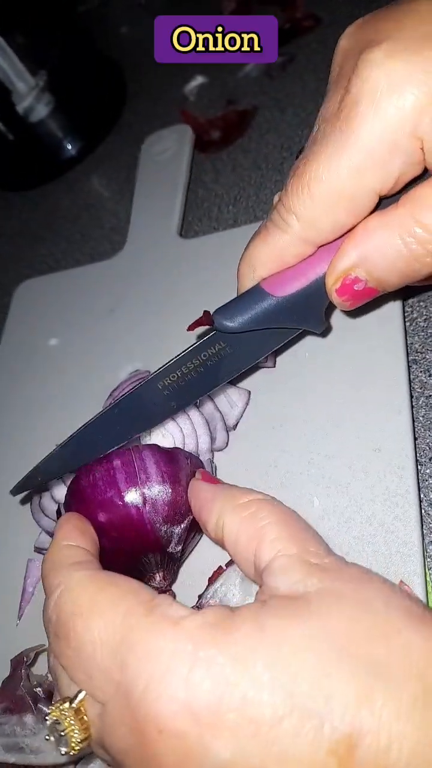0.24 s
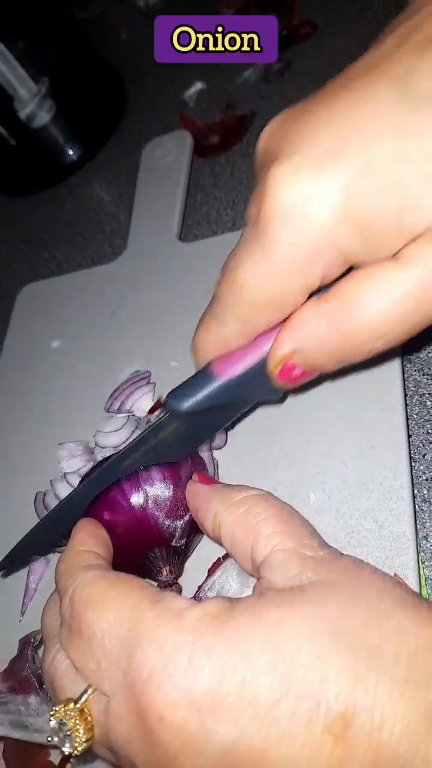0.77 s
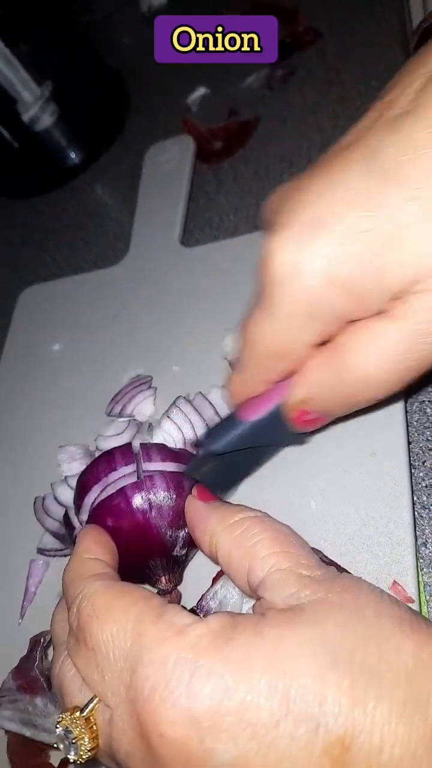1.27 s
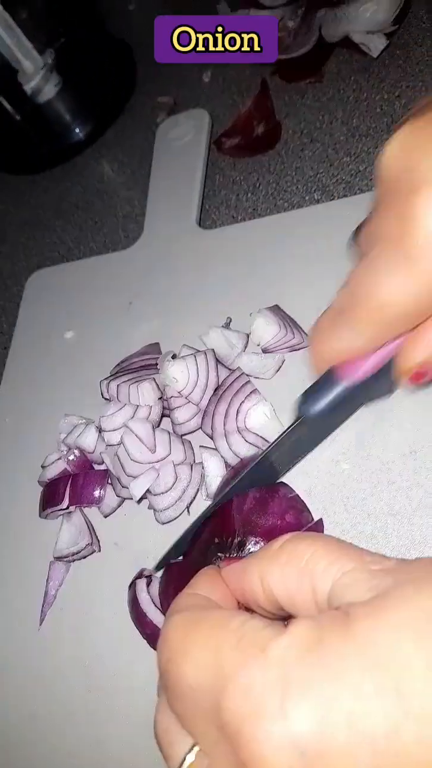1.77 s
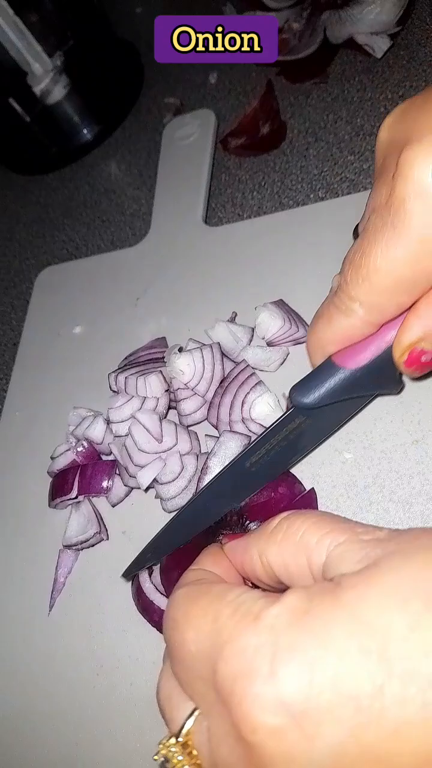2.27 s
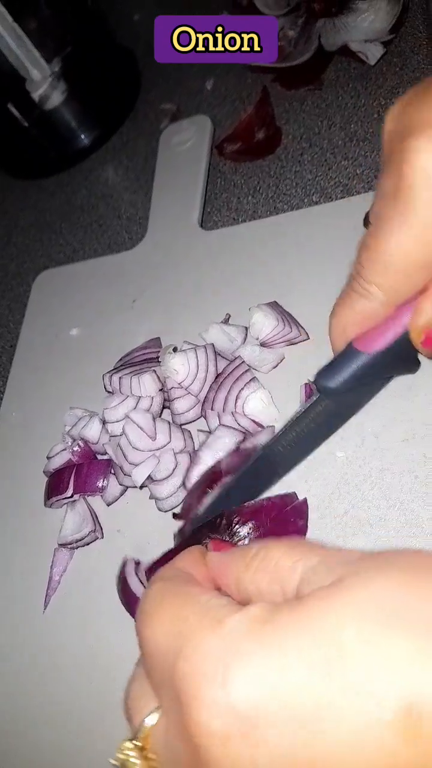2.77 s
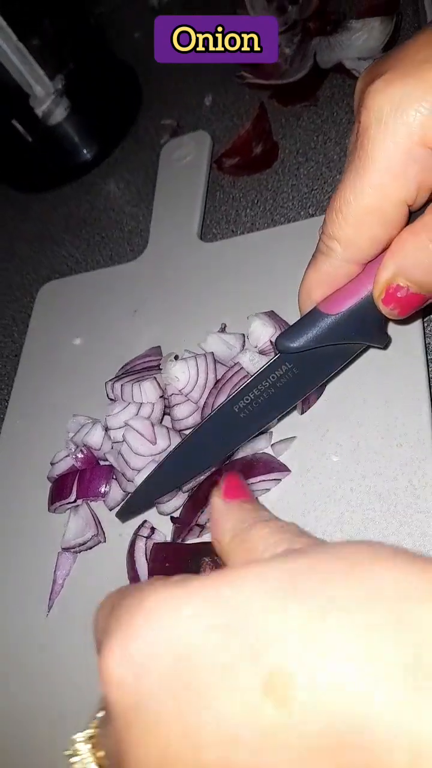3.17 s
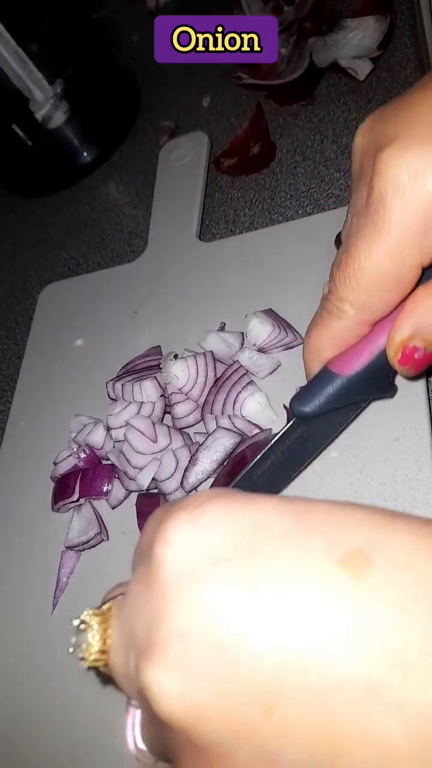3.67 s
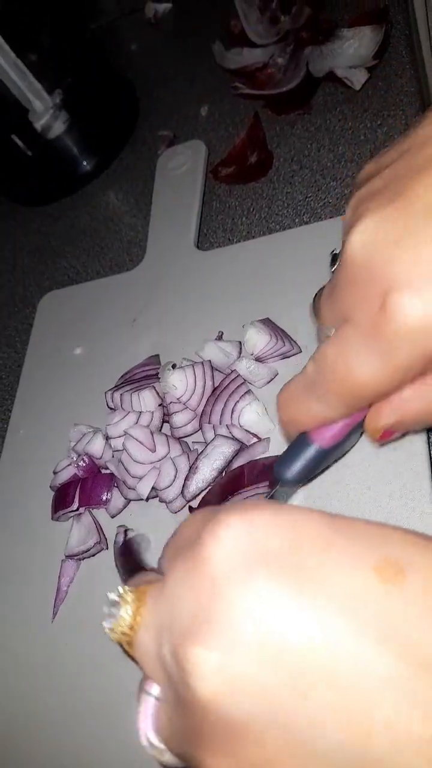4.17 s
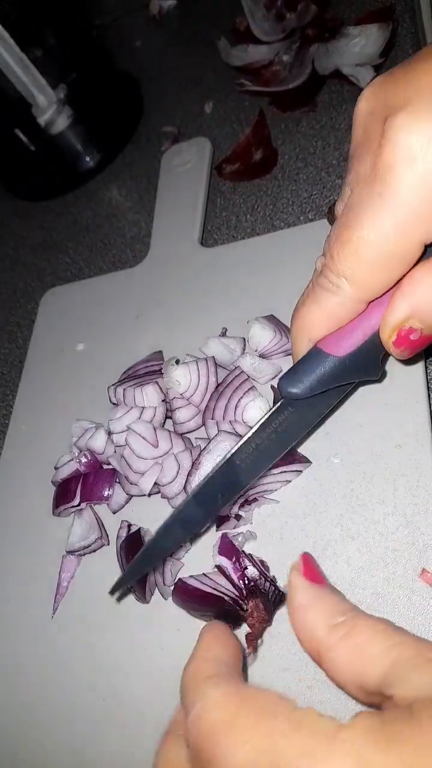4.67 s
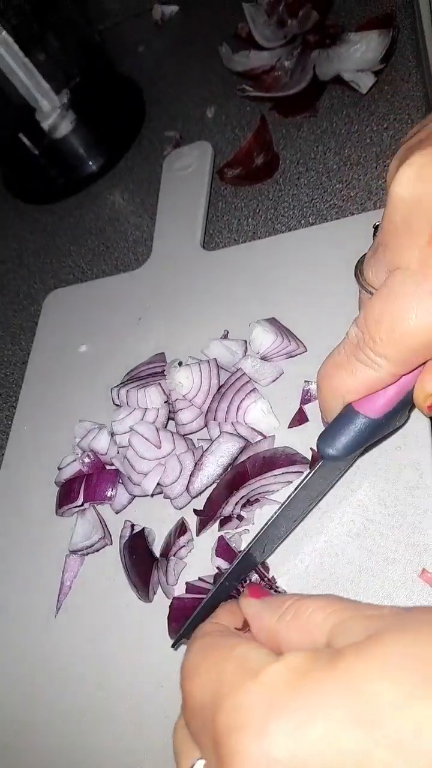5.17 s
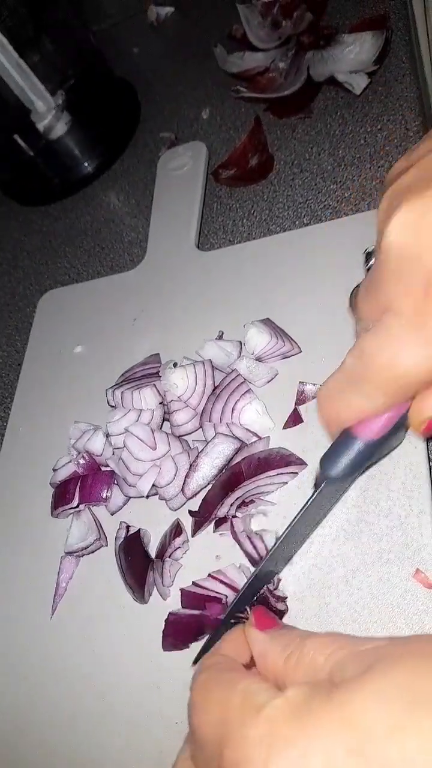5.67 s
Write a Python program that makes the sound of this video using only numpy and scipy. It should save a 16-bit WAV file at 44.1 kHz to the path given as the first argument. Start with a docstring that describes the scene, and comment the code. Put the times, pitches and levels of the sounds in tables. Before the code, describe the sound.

Very close onion cutting on a plastic board, in a small kitchen with a short room response. From 0 to 0.6 s it is nearly quiet, with a few dry papery ticks, the clearest at about 0.55. From 0.67 the blade bites: rasp and wet crunch build with sharp snaps, strongest around 1.38-1.45, then snaps and edge skids thin out until about 1.97. After a pause, two firm crunches come at 2.3-2.55 and 2.65. Then there are only faint ticks, taps and light rustling until 3.8. A gritty stroke with skids follows at 3.9-4.2, ending in a loud snap and deep soft thud near 4.15; a small scrape comes at 4.4. Quiet skin ticks lead to a final cluster of snaps at 5.4-5.72, loudest near 5.6, and a short skid at 5.85. A faint low motor hum and unsteady rumble stay underneath. Phone stereo, snaps brighter on the right.

```python
"""On a kitchen counter, a knife slices onion on a plastic board, close to a phone with two unlike microphones.
The blade crunches through the layers: grainy noise, coloured for skin and flesh, follows each stroke.
Filtered clicks and noise bursts make snaps, skids and dry ticks; board resonances make knocks and taps.
A household motor hums faintly behind as a few unsteady sine waves, with low rumble and room noise."""
import sys
import numpy as np
from scipy import signal
from scipy.fft import rfft, irfft, next_fast_len
from scipy.io import wavfile
from scipy.ndimage import uniform_filter1d, map_coordinates

SR = 44100
rng = np.random.default_rng(int(sys.argv[2]) if len(sys.argv) > 2 else 0)


def convert_level_to_amplitude(level_db):
    """Map a level in decibels to its linear amplitude factor."""
    exponent = np.asarray(level_db, float) / 20
    return 10 ** exponent


def to_wav(sig):
    """Store sig (one row per channel, or 1-D mono) as 16-bit WAV at the path in sys.argv[1].

    Samples outside -1..1 are clipped; the rate is SR.
    """
    pcm = np.clip(np.atleast_2d(sig), -1, 1) * 32767
    pcm = np.round(pcm).astype(np.int16)
    wavfile.write(sys.argv[1], SR, pcm.T)  # frames by channels


N = 261513  # length in samples


def unit(x):
    """Scales a sound to rms 1."""
    return x / np.sqrt(np.mean(x ** 2) + 1e-20)


def peak(x):
    """Scales each row to peak 1."""
    return x / abs(x).max(-1, keepdims=True)


def along(points, hz):
    """Reads a curve of (Hz, value) points on a log frequency axis."""
    f, v = np.transpose(points)
    return np.interp(np.log(hz + 1), np.log(f + 1), v)


def curves(rows, t):
    """Reads each column after the time column at the times t."""
    s, *cols = np.transpose(rows)
    return [np.interp(t, s, c) for c in cols]


def wobble(rate):
    """Draws a smooth random curve with rate knots a second."""
    knots = rng.standard_normal(int(N * rate / SR) + 4)
    return map_coordinates(knots, [np.arange(N) * rate / SR])


def filtered(x, response):
    """Multiplies the spectrum of x by a response given as a function of frequency."""
    m = 2 * next_fast_len(x.shape[-1] // 2 + SR // 8)  # padded so that ringing does not wrap round
    spectrum = rfft(x, m) * response(np.fft.rfftfreq(m, 1 / SR))
    return irfft(spectrum, m)[..., :x.shape[-1]]


def resonance(f, hz, width_hz):
    """One resonance that rings only after it is struck; a narrower width rings longer."""
    return 1j * f * width_hz / (hz * hz - f * f + 1j * f * width_hz)


def lay(rows, times):
    """Places short sounds in time on a stereo track."""
    out = np.zeros((2, N + SR))
    for row, s in zip(rows, times):
        out[:, round(s * SR):][:, :row.shape[-1]] += row
    return out[:, :N]


# How alike left and right are. Each row: frequency in Hz, likeness (0 unrelated, 1 identical).
LIKENESS = [(60, 1), (150, 0.72), (380, 1), (950, 0.16), (2380, 0.29), (5980, 0.34), (15000, 0.25)]


def paired(two):
    """Mixes two unrelated signals into a stereo pair with a set likeness at each frequency."""
    turn = lambda f: np.arccos(np.clip(along(LIKENESS, f), -1, 1)) / 2
    mid, side = filtered(two, lambda f: np.array([np.cos(turn(f)), np.sin(turn(f))]))
    return np.array([mid + side, mid - side])


# Ringing modes of the cutting board. Each row: frequency in Hz, width in Hz, relative level in dB.
BOARD_MODES = [(320, 82.3, 2.5), (339.3, 68, 4.5), (446, 66.7, -5), (572, 99, -16.5), (687.6, 46, -8.5),
               (818, 60, -12.5), (1007, 72, -13.5), (1400, 290, -13)]


def board(f):
    """The board rings in several modes at once, with alternating sign."""
    return sum((-1) ** k * convert_level_to_amplitude(db) * resonance(f, hz, w) for k, (hz, w, db) in enumerate(BOARD_MODES))


def crack(hz, noise):
    """One sharp click with a short spatter of noise, coloured around hz."""
    t = np.arange(noise.shape[-1]) / SR
    click = (t == 0) * 6 + convert_level_to_amplitude(-60 * t / .008) * noise
    return peak(filtered(click, lambda f: resonance(f, hz, .5 * hz) + 0.068 * resonance(f, 1600, 4000)))


def grainy(per_s, life_s, spread_db, bed):
    """Many small tears: a stereo pair of noises made of short bursts of uneven size on a smooth bed."""
    sizes = convert_level_to_amplitude(spread_db * np.clip(rng.exponential(size=N), 0, 3))
    kicks = (rng.random(N) < per_s / SR) * sizes
    bursts = signal.lfilter([1], [1, -np.exp(-1 / (life_s * SR))], kicks)
    return paired((unit(bursts) + bed) * rng.standard_normal((2, N)))


def patchy(pair, depth_db):
    """Each small tear has its own colour: random gain patches about 1 kHz wide and 17 ms long."""
    z = signal.stft(pair, nperseg=128)[2]
    field = rng.standard_normal(z.shape[1:])
    field = uniform_filter1d(uniform_filter1d(field, size=3, axis=0), size=12, axis=1)
    return signal.istft(z * convert_level_to_amplitude(depth_db * unit(field)), nperseg=128)[1][:, :N]


# Steady tones of the motor. Each row: frequency in Hz, relative level in dB.
MOTOR_LINES = [(55, -9.5), (110, -4), (165, -1), (220, -13.5), (275, -14.5), (330, -12.5)]
# Slow swelling of the background. Each row: time in seconds, hum setting in dB, rumble setting in dB.
SWELLING = [(0.0, -83, -93), (0.76, -66, -50.5), (0.89, -64.5, -48.5), (1.3, -69, -46.5),
            (1.75, -69.5, -54.5), (2.03, -60.5, -58), (2.26, -69, -54), (2.54, -58.5, -47.5),
            (2.86, -66, -64), (3.42, -68.5, -62.5), (4.11, -59.5, -60), (4.53, -70.5, -67.5),
            (4.84, -71.5, -64), (5.32, -68, -64), (5.61, -57.5, -50.5), (5.93, -64.5, -64)]


def motor_hum():
    """A motor gives a row of tones; their shared pitch drifts slightly and each level wavers."""
    t = np.arange(N) / SR
    hum_db = curves(SWELLING, t)[0]
    drift = 0.0043 * np.cumsum(wobble(3)) / SR
    lines = 0
    for hz, db in MOTOR_LINES:
        cycles = hz * (t + drift) + 0.08 * (hz / 55) ** 2  # the last part spreads the starting phases
        lines = lines + convert_level_to_amplitude(db + 2.9 * wobble(12)) * np.sin(2 * np.pi * cycles)
    return convert_level_to_amplitude(hum_db + 7.5) * lines


# Colour of the room noise. Each row: frequency in Hz, relative level in dB per Hz.
ROOM_COLOUR = [(30, -12.5), (100, -3), (200, -7.5), (330, -3.5), (450, -28.5), (1000, -37), (3000, -39.5),
               (6000, -30.5), (16000, -41)]


def room_noise():
    """Three filtered noises: a low rumble that swells, steady room noise and a faint hiss."""
    rumble_db = curves(SWELLING, np.arange(N) / SR)[1]
    rumble = unit(filtered(paired(rng.standard_normal((2, N))), lambda f: resonance(f, 84, 120) ** 2))
    air = unit(filtered(paired(rng.standard_normal((2, N))), lambda f: convert_level_to_amplitude(along(ROOM_COLOUR, f))))
    hiss = filtered(rng.standard_normal((2, N)), lambda f: 1 + 1.5 * resonance(f, 12000, 8000))
    return convert_level_to_amplitude(rumble_db - 5.0) * rumble + convert_level_to_amplitude(-80) * air + convert_level_to_amplitude(-85) * hiss


# How long the room rings. Each row: frequency in Hz, seconds to fall by 60 dB.
ROOM_DECAY = [(200, 0.31), (2000, 0.11), (10000, 0.33)]


def kitchen(x):
    """The room answers with dying noise, each frequency at its own speed."""
    hz, t, z = signal.stft(rng.standard_normal((2, SR // 2)), SR, nperseg=256)
    tail = signal.istft(z * convert_level_to_amplitude(-60 * t / along(ROOM_DECAY, hz)[:, None]), SR, nperseg=256)[1]
    late = np.pad(x, ((0, 0), (300, 0)))  # the answer starts 300 samples later
    return signal.fftconvolve(late, tail / np.linalg.norm(tail[0]), axes=1)[:, :N]


# Dull pushes on the counter. Each row: time in seconds, middle of the left and right peaks in dB, pitch in Hz.
PUSHES = [(0.738, -41.5, 92), (0.859, -36, 114), (1.398, -35, 110.6), (2.43, -39.5, 82.6), (2.66, -44, 74),
          (4.16, -24, 50.4), (5.577, -40, 87)]


def thuds():
    """The counter gives a few low cycles that die quickly, stronger on the right."""
    s, db, hz = np.transpose(PUSHES)[:, :, None, None]
    t = np.arange(SR // 4) / SR
    swing = np.sin(2 * np.pi * hz * t) * convert_level_to_amplitude(-60 * t / 0.12) * (1 - np.exp(-t / 0.0009))
    return lay(convert_level_to_amplitude(db + [[-2.5], [2.5]]) * peak(swing), s.ravel() - .008)  # begins just before the listed time


# Soft taps of pieces and fingers on the board. Each row: start in seconds, level setting in dB.
SOFT_TAPS = [(1.075, -28), (2.232, -35.5), (2.302, -48.5), (3.137, -39), (3.652, -42.5), (5.408, -29)]


def taps():
    """A soft contact excites mostly the low board modes."""
    s, db = np.transpose(SOFT_TAPS)
    t = np.arange(SR // 8) / SR
    push = rng.standard_normal((len(s), 1, len(t))) * convert_level_to_amplitude(-60 * t / 0.021)
    knock = filtered(push, lambda f: board(f) / (1 + 1j * f / 450) ** 3)
    return lay(convert_level_to_amplitude(db - 7.0)[:, None, None] * peak(knock), s)


# Dry onion skin ticking. Each row: start in seconds, level setting in dB, centre in Hz.
SKIN_TICKS = [(0.1277, -53, 6340), (0.2, -44, 4660), (0.2756, -46, 5670), (0.322, -53.5, 2860),
              (0.4237, -37, 5300), (0.5544, -22, 4300), (2.2894, -56, 4790), (2.789, -56, 4400),
              (2.872, -57.5, 4700), (2.9704, -40, 3680), (3.055, -53.5, 4490), (3.09, -44, 7000),
              (3.0987, -49, 6200), (3.5613, -54, 5700), (3.618, -55.5, 5470), (3.939, -47, 5700),
              (4.4251, -42, 4860), (4.473, -46.5, 5730), (4.487, -46, 4430), (4.4941, -42.5, 4070),
              (5.0869, -64, 4780), (5.139, -58.5, 4360), (5.185, -44, 4470), (5.248, -42, 5660),
              (5.273, -53, 4700), (5.293, -48, 4940), (5.8271, -41, 3480)]
CRACKLE_DB, CRACKLE_HZ = 5, 5000  # chance ticks: middle setting over the rasp setting, middle pitch
THIN_HZ = 1524  # dry skin has little body below this


def ticks(count=200):
    """Papery skin gives bare bright cracks; count more come by chance, following the rasp of the moment."""
    when, size, pitch = rng.random((count, 3)).T
    rasp_db = strokes()[0][(when * N).astype(int)]
    chance_db = rasp_db + CRACKLE_DB + 8 * (size - .5)
    chance = [when * N / SR, chance_db, CRACKLE_HZ * 2 ** (pitch - .5)]
    s, db, hz = np.hstack([np.transpose(SKIN_TICKS), chance])[:, :, None, None]
    noise = rng.standard_normal((len(s), 4, SR // 40))
    bright = convert_level_to_amplitude(-4.5) * crack(10000, noise[:, 2:])
    bare = lay(convert_level_to_amplitude(db + 5) * (crack(hz, noise[:, :2]) + bright), s.ravel())
    return filtered(bare, lambda f: (1j * f / (THIN_HZ + 1j * f)) ** 2)


# The blade edge skids on the board. Each row: start in seconds, scrape level in dB, centre in Hz,
# board drone in dB relative to the scrape, length of the drag in seconds.
EDGE_SKIDS = [(0.721, -21, 5500, -13, 0.012), (1.174, -29.5, 3030, 0.5, 0.073),
              (1.342, -18.5, 4400, -6, 0.036), (1.805, -29, 4400, -15, 0.034),
              (1.913, -24, 4870, -18, 0.0065), (1.961, -23.5, 2170, 0.5, 0.019),
              (3.985, -33.5, 5000, -10, 0.04), (4.058, -28, 3920, -3.5, .03),
              (4.123, -19.5, 4740, -8, 0.026), (4.378, -38, 1614, 2.5, 0.031),
              (4.731, -60.5, 2000, -16.5, 0.038), (5.398, -37, 4500, -19, 0.022),
              (5.845, -25.5, 2100, -3.5, 0.057)]


def skids():
    """A skid starts at once, goes on while the edge drags, then dies away; the board drones under it."""
    s, db, hz, board_db, length = np.transpose(EDGE_SKIDS)[:, :, None, None]
    t = np.arange(SR // 6) / SR
    drag = convert_level_to_amplitude(-60 * np.maximum(t - length, 0) / 0.022) * rng.standard_normal((len(s), 3, len(t)))
    drag = drag * (1 + 0.62 * convert_level_to_amplitude(-60 * t / 0.0054))  # the edge bites hardest at first contact
    colour = lambda f: resonance(f, hz, 1.2 * hz) + 0.39 * resonance(f, 16000, 7000)
    scrape = peak(filtered(drag[:, :2], colour))
    drone = peak(filtered(drag[:, 2:], board))
    return paired(lay(convert_level_to_amplitude(db) * scrape, s.ravel())) + lay(convert_level_to_amplitude(db + board_db) * drone, s.ravel())


# Snaps of the layers and knocks on the board. Each row: start in seconds, level setting in dB,
# centre in Hz, board knock setting in dB relative to the snap.
LAYER_SNAPS = [(0.0567, -40.5, 5260, -53), (0.164, -44.5, 2730, -48), (0.212, -33.5, 6200, -54),
               (0.4599, -29.5, 6220, -55), (0.665, -26, 5470, -18.5), (0.6981, -35, 2730, -5.5),
               (0.7735, -37, 2630, -0.5), (0.8008, -19.5, 5200, -27.5), (0.884, -22, 3250, -19.5),
               (0.9112, -24.5, 3200, -7.5), (0.9422, -19, 5800, -54), (0.9858, -26.5, 3720, -17),
               (0.9933, -12.5, 4500, -24.5), (1.0933, -12, 2960, -42), (1.0968, -16.5, 3200, -38.5),
               (1.1378, -29, 5450, -12.5), (1.2624, -17.5, 4700, -13.5), (1.3833, -17, 3130, -15),
               (1.3902, -21.5, 2173, -20), (1.3978, -12, 4530, -21), (1.4375, -4, 2290, -13),
               (1.567, -14, 3130, -47), (1.6342, -15, 2563, -18), (1.7128, -30.5, 4700, -35),
               (1.7668, -23, 3350, -25.5), (1.8324, -23.5, 5050, -34), (1.8612, -20, 6200, -26),
               (2.3334, -24, 3540, -31), (2.3927, -21, 4610, -10), (2.4145, -10.5, 3380, -14),
               (2.4371, -18, 4430, -11.5), (2.4916, -17, 4990, -12), (2.5339, -19, 4820, -10),
               (2.6496, -7, 2356, -20.5), (2.834, -34.5, 2280, 1.5), (2.934, -33, 4340, -36),
               (4.011, -40, 3000, 1), (4.0392, -18, 5600, -28), (4.0919, -18.5, 5990, -18.5),
               (4.1474, -5.5, 2230, -27.5), (4.4004, -29, 1400, -10), (5.324, -36, 5200, -14),
               (5.4798, -27, 4230, -19), (5.5047, -32.5, 3600, -2.5), (5.5195, -22.5, 4060, -14),
               (5.5433, -20.5, 3390, -12), (5.569, -13, 4500, -18.5), (5.602, -4, 4560, -19.5),
               (5.6402, -16, 1700, -22), (5.6563, -6.5, 3460, -16), (5.715, -21, 2740, -31)]
# fizz over the snap setting at 4 kHz and -17 dB, more for high snaps, less per dB for loud ones
SPIT_DB, SPIT_DB_PER_OCT, SPIT_SHRINK = -9.5, 2, .4
TAIL_DB, TAIL_SPREAD_DB = -17, 3  # noisy tail relative to the snap setting, and its random spread


def snaps():
    """Each snap is a sharp crack that scatters into a broad noisy tail, spits fizz and knocks the board."""
    s, db, hz, board_db = np.transpose(LAYER_SNAPS)[:, :, None, None]
    fizz_db = SPIT_DB + SPIT_DB_PER_OCT * np.log2(hz / 4000) - SPIT_SHRINK * (db + 17)
    t = np.arange(SR // 8) / SR
    noise = rng.standard_normal((len(s), 7, len(t)))
    tail_db = TAIL_DB + TAIL_SPREAD_DB * noise[:, :1, -1:]  # one random draw for each snap
    tail = peak(filtered(convert_level_to_amplitude(-60 * t / 0.049) * noise[:, 2:4], lambda f: resonance(f, hz, 1.2 * hz)))
    fizz = peak(filtered(convert_level_to_amplitude(-60 * t / .02) * noise[:, 4:6], lambda f: resonance(f, 17000, 7000) ** 2))
    blow = noise[:, 6:] * convert_level_to_amplitude(-60 * t / 0.0015) + 4 * (t == 0)
    knock = peak(filtered(blow, board))
    direct = convert_level_to_amplitude(2.0) * crack(hz, noise[:, :2]) + convert_level_to_amplitude(fizz_db) * fizz + convert_level_to_amplitude(board_db + 2.1) * knock
    direct = direct + convert_level_to_amplitude(board_db + 1.5) * crack(2100, noise[:, 6:])  # the blow on the board also clacks
    return lay(convert_level_to_amplitude(db) * direct, s.ravel()) + paired(lay(convert_level_to_amplitude(db + tail_db) * tail, s.ravel()))


# Strokes of blade or fingers through the onion. Each row: time of full pressure in seconds, rise in seconds,
# hold in seconds, skin rasp setting in dB, flesh crunch setting in dB relative to the rasp.
PRESSURE_STROKES = [(0.0, .01, 0.0039, -72.5, 4), (0.29, .05, 0.089, -83.5, 4),
                    (0.557, .02, 0.061, -69, -8), (0.22, 0.17, 0.018, -75.5, 2.5),
                    (0.464, .1, 0.054, -81.5, 14), (0.672, 0.1, 0.12, -60, 2.5),
                    (0.807, 0.16, 0.054, -47.5, 5.5), (0.912, 0.063, 0.01, -49, 2.5),
                    (0.982, 0.015, 0.013, -46.5, 1), (1.041, 0.2, 0.017, -44.5, 5.5),
                    (1.202, 0.24, .04, -43, 2.5), (1.246, 0.073, 0.017, -40, 2.5),
                    (1.378, 0.062, 0.016, -32, -2.5), (1.428, .02, 0.0045, -52, 24.5),
                    (1.549, 0.078, 0.013, -46, 0), (1.715, 0.023, 0.022, -55, 1),
                    (1.831, 0.029, 0.064, -48.5, 4), (1.966, 0.012, 0.0013, -63, 16),
                    (2.05, .02, 0.2, -76, -17), (2.422, .14, .1, -34.5, -1),
                    (2.309, 0.13, 0.028, -62, -0.5), (2.635, 0.042, .008, -33, 3.5),
                    (2.651, .02, 0.036, -43.5, 7.5), (2.841, .1, 0.12, -67, -9),
                    (3.107, 0.27, 0.027, -76, -5.5), (3.379, 0.21, 0.085, -69, -7.5),
                    (3.587, 0.18, 0.12, -68, -6), (3.797, 0.048, 0.03, -59.5, -15),
                    (3.885, 0.22, 0.047, -52, -3.5), (4.014, 0.24, 0.024, -49.5, -4),
                    (4.063, 0.018, 0.018, -40, -9), (4.143, 0.12, 0.04, -38.5, 6.5),
                    (4.393, 0.12, 0.057, -66.5, 2.5), (5.098, 0.017, 0.13, -77.5, -20),
                    (5.251, 0.24, 0.053, -66, -23), (5.328, .15, 0.059, -56.5, -5.5),
                    (5.415, 0.04, 0.04, -45.5, -13), (5.485, .03, .035, -42.5, -18),
                    (5.556, 0.18, 0.04, -36.5, -7), (5.652, 0.025, 0.04, -44, 12.5)]
# Level of the fizz over time. Each row: time in seconds, setting in dB relative to the rasp.
FIZZ_LEVEL = [(0, 0), (.6, 2.5), (1.0, -0.5), (1.6, -8), (2.4, -12), (3.0, -7), (3.7, -6), (4.2, -10),
              (5.2, -9), (5.9, -8)]
RISE_DB, RELEASE_DB_PER_S = 39, 263  # climb during the rise, fall after the hold
LINGER_DB, LINGER_DB_PER_S = -25, 67.5  # a faint slower tail of the same cutting noise after each stroke
RUMBLE_DB, RUMBLE_FLESH = -5.5, 0.57  # rumble setting over the rasp, and how far it follows the flesh
FIZZ_DULLING = 1  # dB of fizz lost per dB that the flesh outweighs the skin


def strokes():
    """Settings in dB of rasp, crunch, rumble and fizz: a stroke climbs, holds, lets go; strokes add in power."""
    s, rise, hold, db, flesh = np.transpose(PRESSURE_STROKES)[:, :, None]
    t = np.arange(0, N + 64, 64) / SR
    after = np.maximum(t - s - hold, 0)
    climb = -RISE_DB * np.maximum(s - t, 0) / rise
    release = np.maximum(-RELEASE_DB_PER_S * after, LINGER_DB - LINGER_DB_PER_S * after)
    press = db + climb + release
    rumble = RUMBLE_DB + RUMBLE_FLESH * flesh
    fizz = curves(FIZZ_LEVEL, t)[0] - FIZZ_DULLING * np.maximum(flesh, 0)
    levels = []
    for share in [0, flesh, rumble, fizz]:
        power = (convert_level_to_amplitude(press + share) ** 2).sum(0)
        levels.append(np.interp(np.arange(N) / SR, t, 10 * np.log10(power + 1e-10)))
    return levels


# Colour of the tearing skin. Each row: frequency in Hz, relative level in dB per Hz.
SKIN_RASP = [(1500, -40), (2500, -18), (3200, -5), (4600, 0), (5800, -2), (7300, -8), (8500, -30)]
# Colour of the crushed flesh. Each row: frequency in Hz, relative level in dB per Hz.
FLESH_CRUNCH = [(600, -26.5), (1000, -2), (1400, -4.5), (2300, 5), (3000, -0.5), (4500, -27)]
# Colour of the high fizz. Each row: frequency in Hz, relative level in dB per Hz.
HIGH_FIZZ = [(4410, -18.5), (7500, -6.5), (9700, -3.5), (12700, -5.5), (14700, -1.5), (15700, -3.5),
             (16000, -30)]


def cutting():
    """Cells burst along the blade: high rasp in the skin, lower crunch in the flesh, fizz, board rumble."""
    rasp_db, crunch_db, rumble_db, fizz_db = strokes()
    skin = patchy(grainy(600, .001, spread_db=3.5, bed=.9), depth_db=3)
    flesh = patchy(grainy(400, .0015, spread_db=3.5, bed=.9), depth_db=3)
    rasp = unit(filtered(skin, lambda f: convert_level_to_amplitude(along(SKIN_RASP, f))))
    crunch = unit(filtered(flesh, lambda f: convert_level_to_amplitude(along(FLESH_CRUNCH, f))))
    fizz = unit(filtered(skin, lambda f: convert_level_to_amplitude(along(HIGH_FIZZ, f))))
    rumble = unit(filtered(grainy(98, 0.02, spread_db=11.0, bed=0.71), board))
    layers = convert_level_to_amplitude(rasp_db + 1.5) * rasp + convert_level_to_amplitude(crunch_db - 4.36) * crunch
    layers = layers + convert_level_to_amplitude(fizz_db + 11.0) * fizz + convert_level_to_amplitude(rumble_db + 2.5) * rumble
    return convert_level_to_amplitude(1.5 * wobble(40)) * layers  # the whole cut flutters a little


def scene():
    """Knife, onion and board in the room, over the hum."""
    hits = snaps() + skids() + taps() + ticks()
    room = convert_level_to_amplitude(-11.5) * paired(kitchen(hits))
    return hits + room + cutting() + thuds() + motor_hum() + room_noise()


def causal(db):
    """Turns gains in dB into a minimum-phase response, which never sounds before its input."""
    c = irfft(db * np.log(10) / 20)
    half = c.shape[-1] // 2
    fold = np.concatenate([[1], np.full(half - 1, 2), [1], np.zeros(c.shape[-1] - half - 1)])
    return np.exp(rfft(c * fold))


def top_cut(x):
    """Nothing passes above the cut-off."""
    return signal.sosfilt(signal.butter(12, 16800, fs=SR, output="sos"), x)


# Colour shared by both microphones. Each row: frequency in Hz, gain in dB.
MIC_COLOUR = [(20, -19.5), (45, -9), (80, 0), (6000, -1), (7000, -4), (7800, -9), (10000, -10), (13000, -5),
              (15300, -10.5), (16000, -25.5), (17000, -56)]
# How the microphones differ. Each row: frequency in Hz, left minus right in dB.
PORT_DIFFERENCE = [(60, -6), (92, 2), (140, -1.5), (210, 5.5), (330, -4.5), (500, 5), (770, -0.5),
                   (1170, 0), (1790, -3), (2740, -13.5), (4190, -11.5), (6410, -7), (9810, 6), (15000, 3)]
RIGHT_LAG = .00008  # the right port is a little farther from the board [s]


def record(dry):
    """The two ports favour different bands, the right one hears slightly later, and both lose treble."""
    lag = lambda f: np.exp(-2j * np.pi * f * np.array([[0], [RIGHT_LAG]]))
    gains = lambda f: along(MIC_COLOUR, f) + along(PORT_DIFFERENCE, f) * np.array([[.5], [-.5]])
    heard = filtered(dry, lambda f: causal(gains(f)) * lag(f))
    return top_cut(heard)


dry = scene()
out = record(dry)
to_wav(out)
```